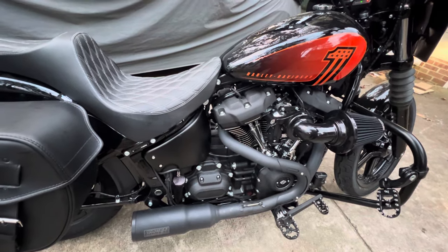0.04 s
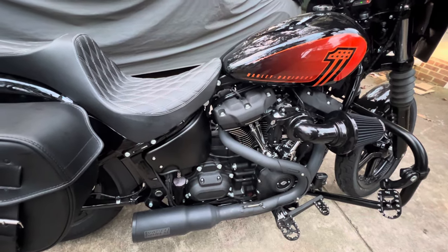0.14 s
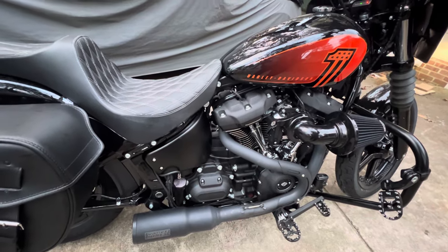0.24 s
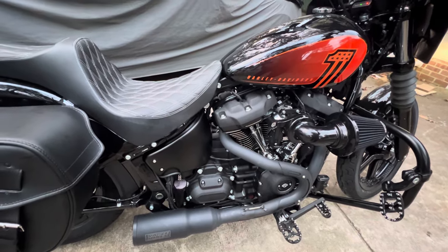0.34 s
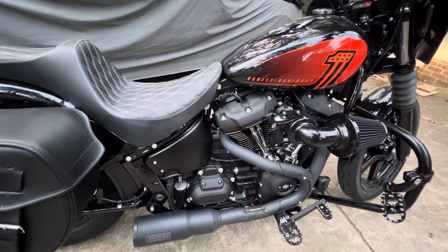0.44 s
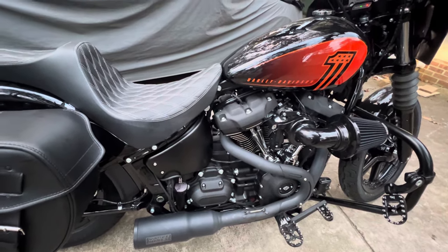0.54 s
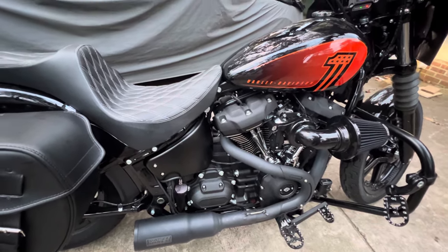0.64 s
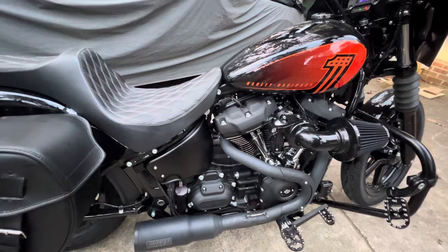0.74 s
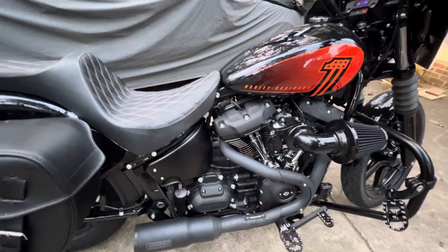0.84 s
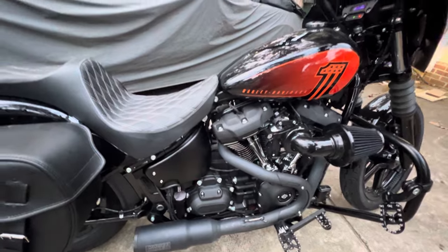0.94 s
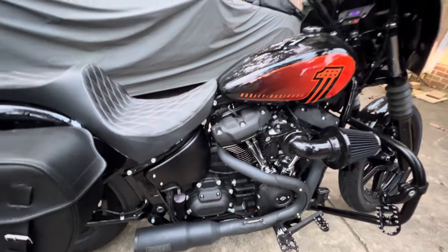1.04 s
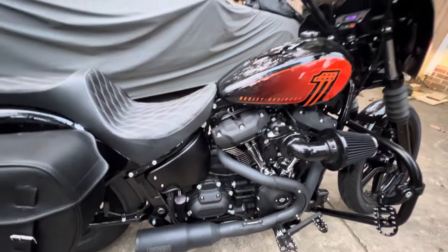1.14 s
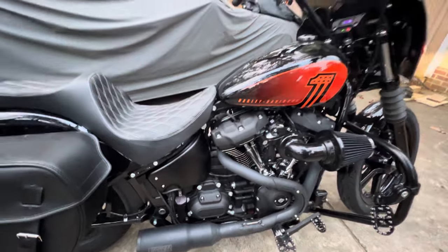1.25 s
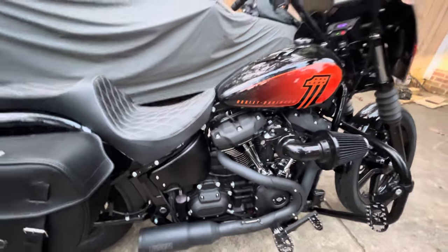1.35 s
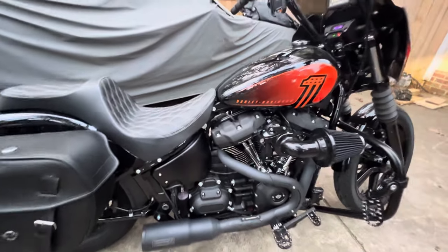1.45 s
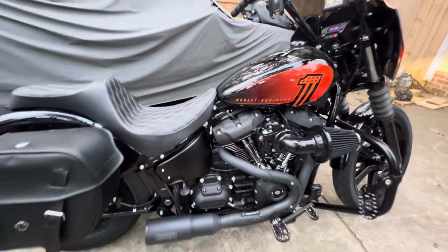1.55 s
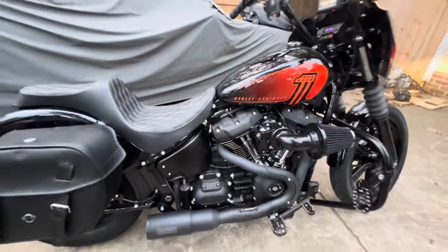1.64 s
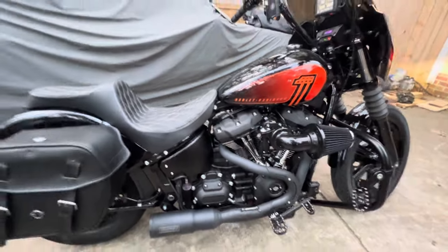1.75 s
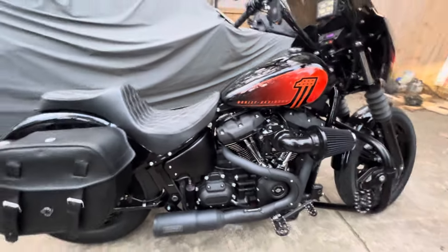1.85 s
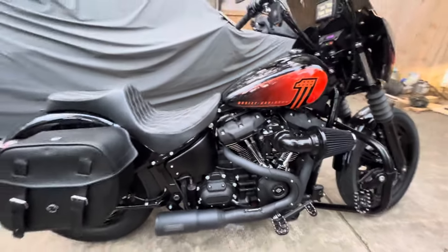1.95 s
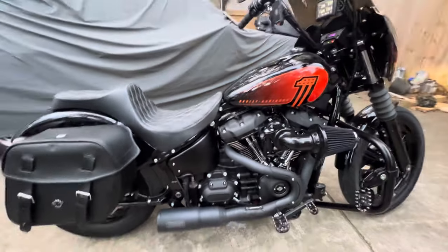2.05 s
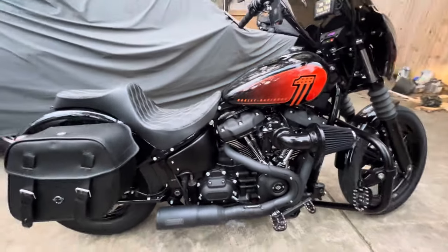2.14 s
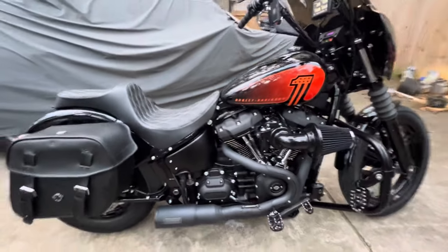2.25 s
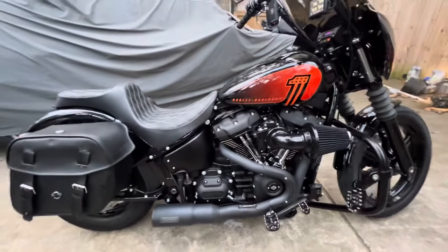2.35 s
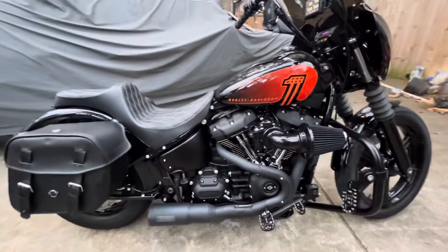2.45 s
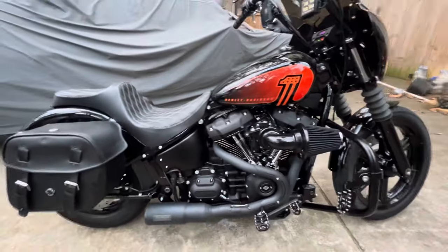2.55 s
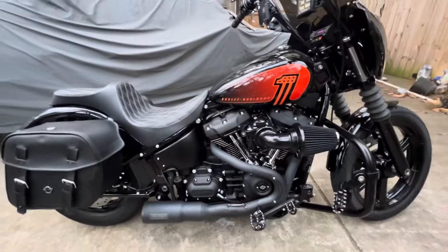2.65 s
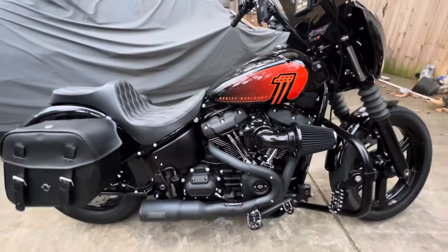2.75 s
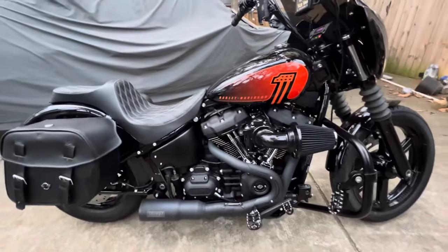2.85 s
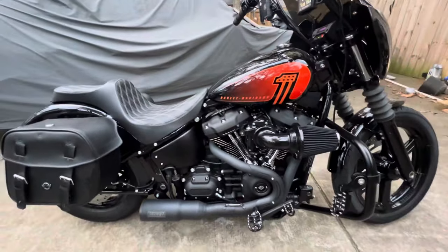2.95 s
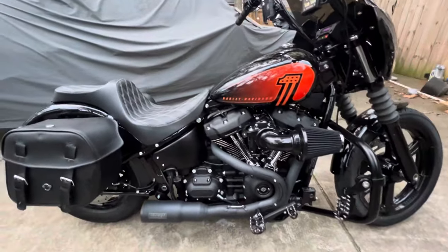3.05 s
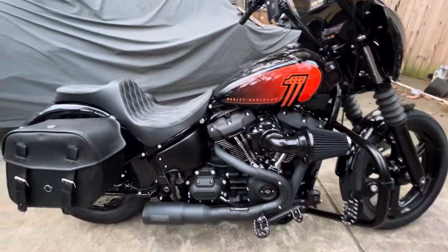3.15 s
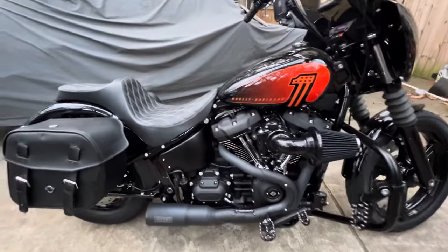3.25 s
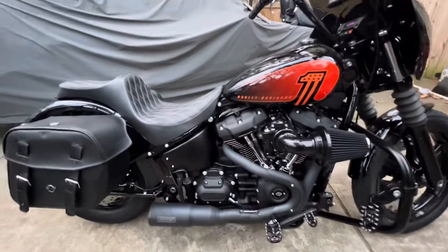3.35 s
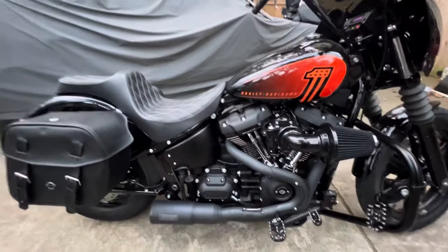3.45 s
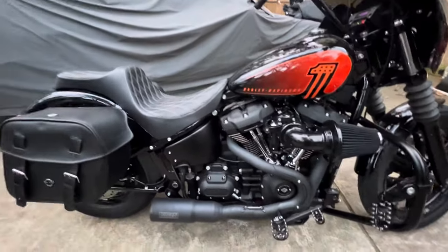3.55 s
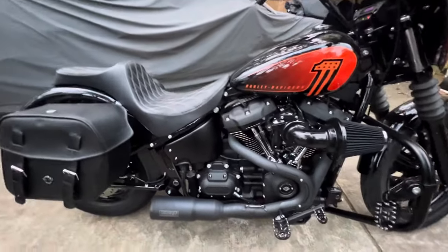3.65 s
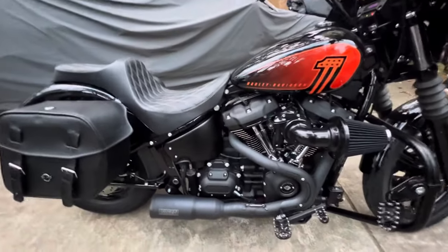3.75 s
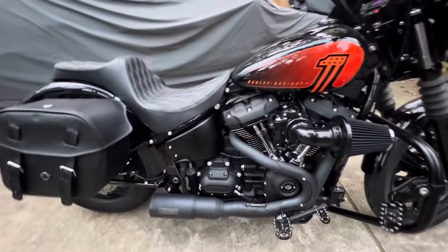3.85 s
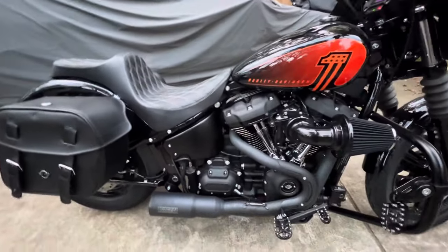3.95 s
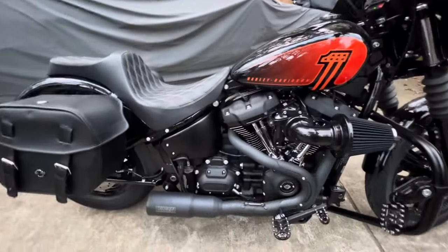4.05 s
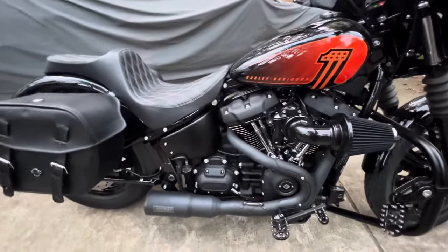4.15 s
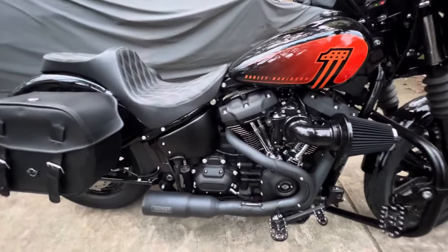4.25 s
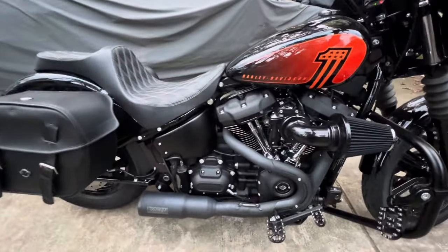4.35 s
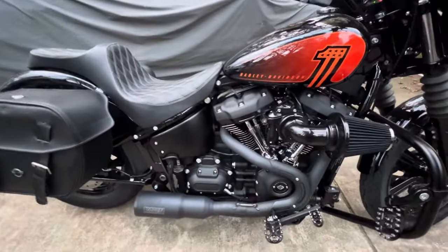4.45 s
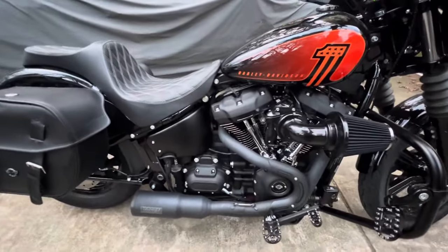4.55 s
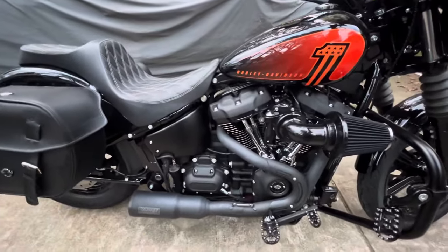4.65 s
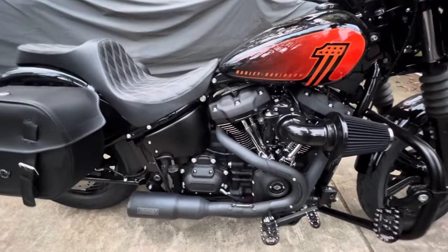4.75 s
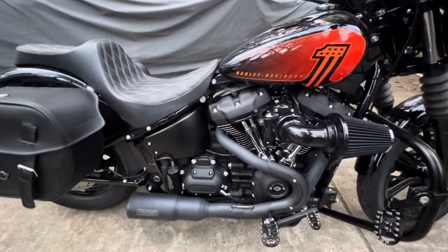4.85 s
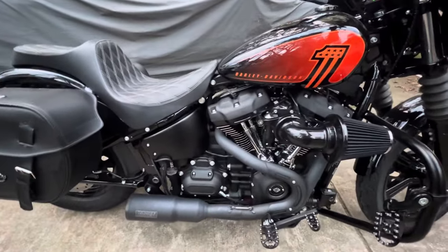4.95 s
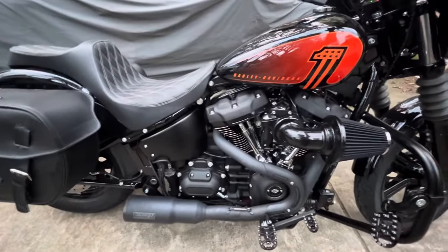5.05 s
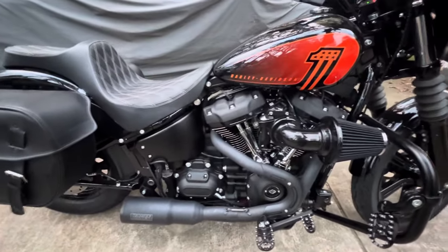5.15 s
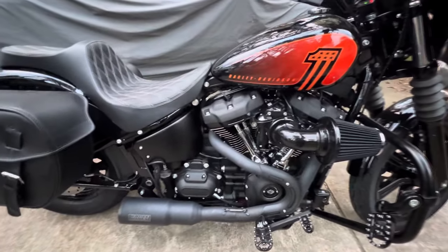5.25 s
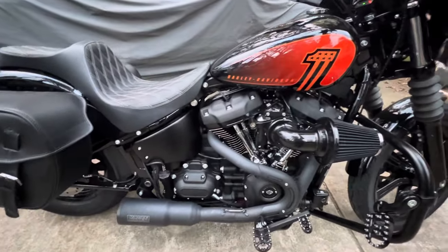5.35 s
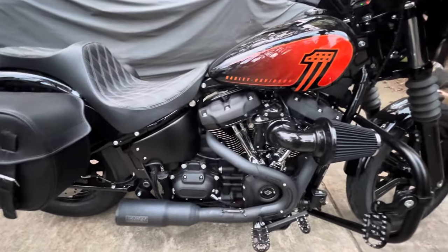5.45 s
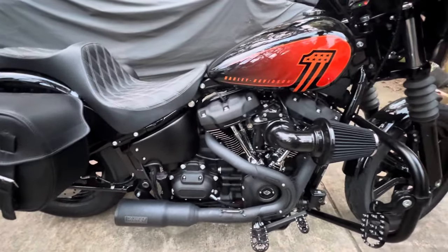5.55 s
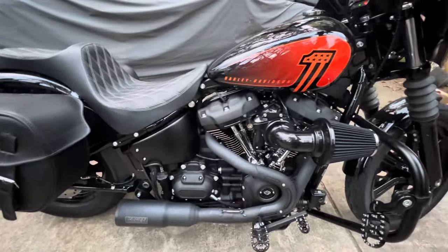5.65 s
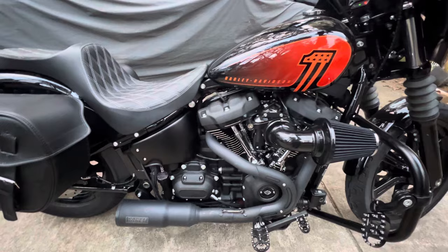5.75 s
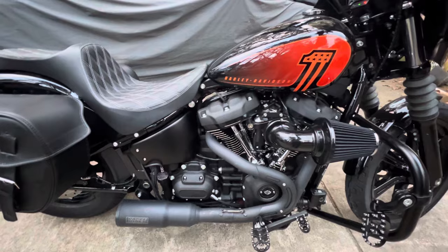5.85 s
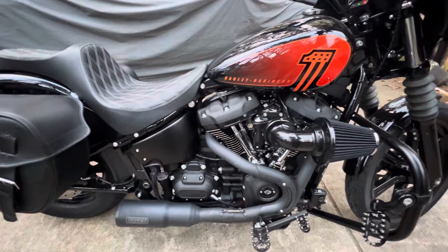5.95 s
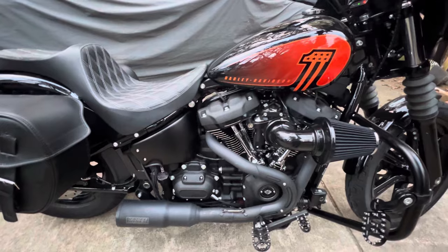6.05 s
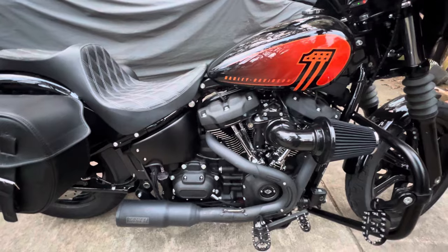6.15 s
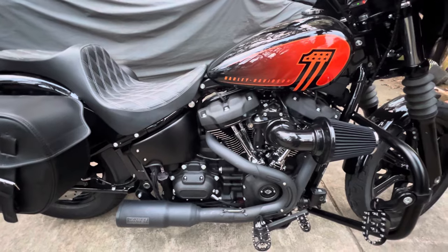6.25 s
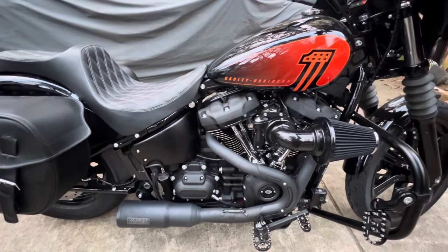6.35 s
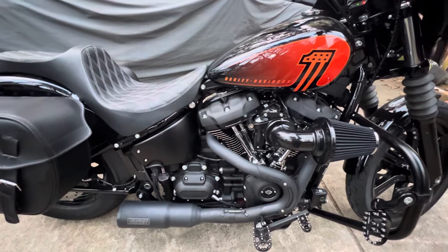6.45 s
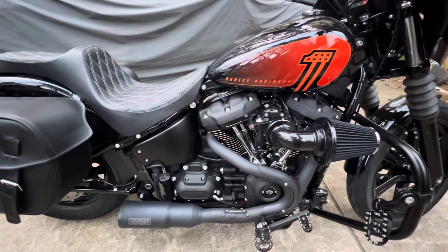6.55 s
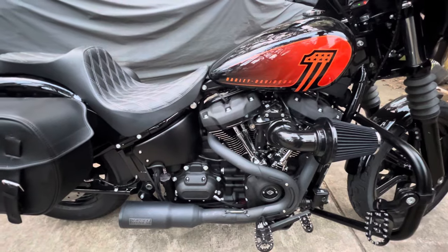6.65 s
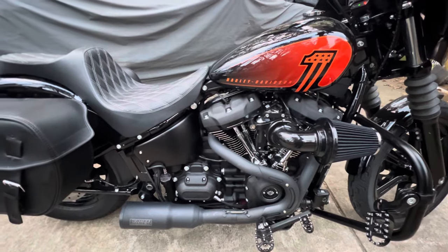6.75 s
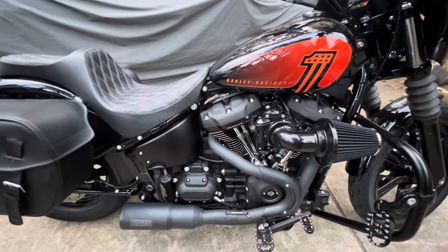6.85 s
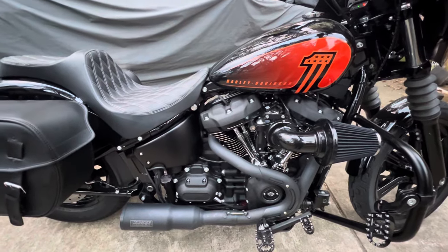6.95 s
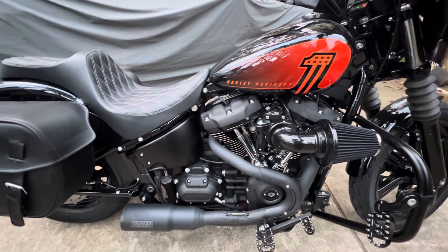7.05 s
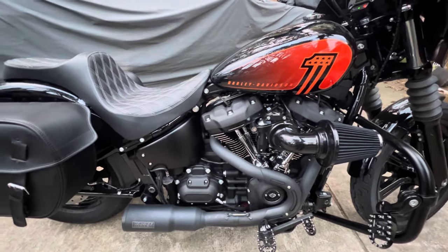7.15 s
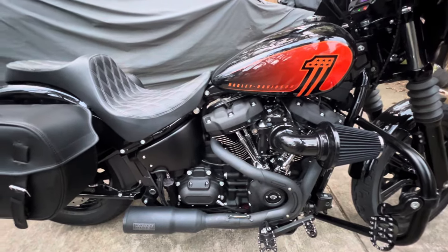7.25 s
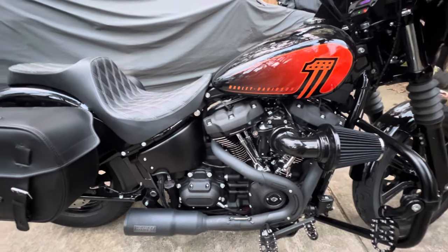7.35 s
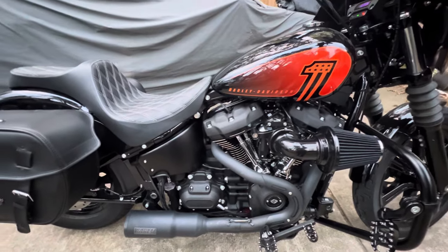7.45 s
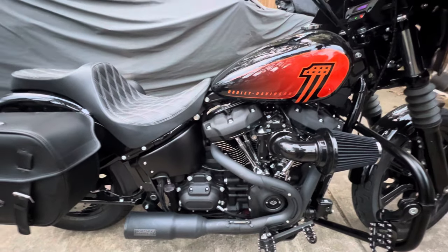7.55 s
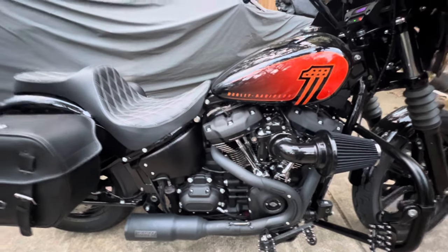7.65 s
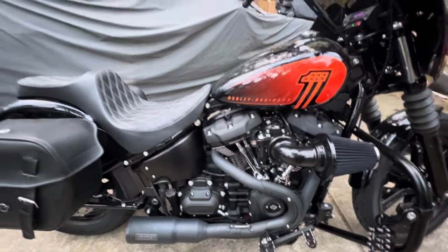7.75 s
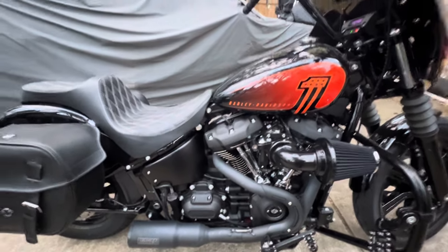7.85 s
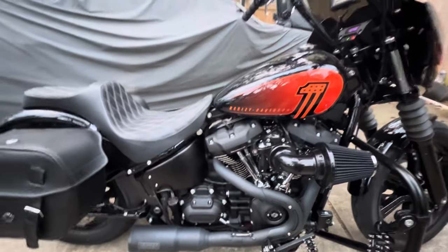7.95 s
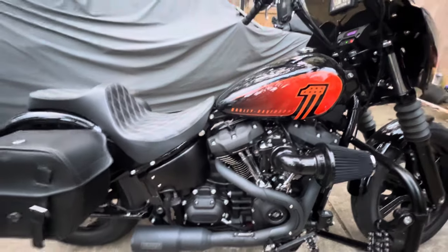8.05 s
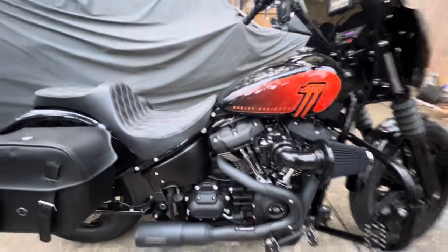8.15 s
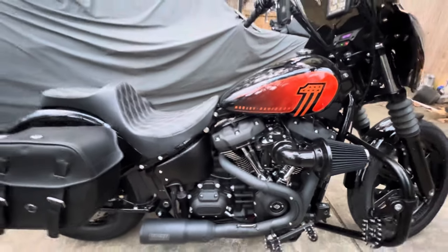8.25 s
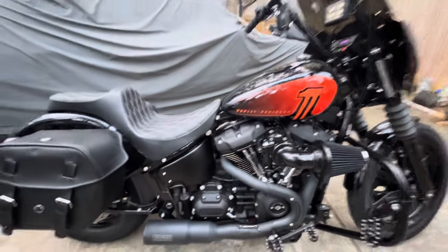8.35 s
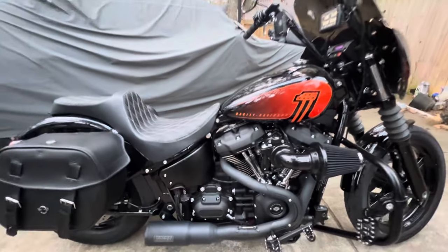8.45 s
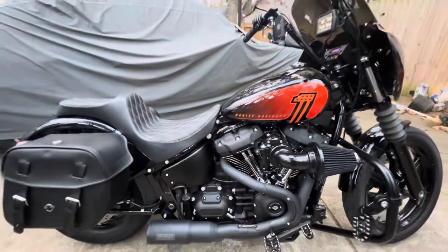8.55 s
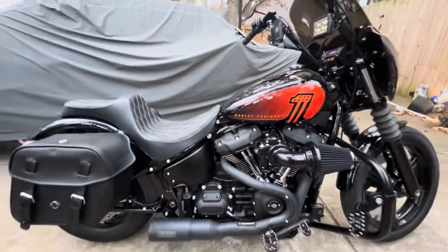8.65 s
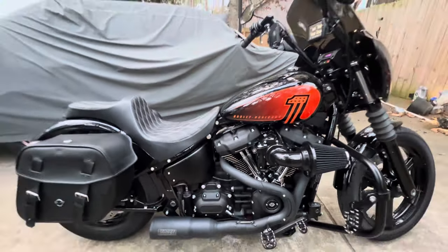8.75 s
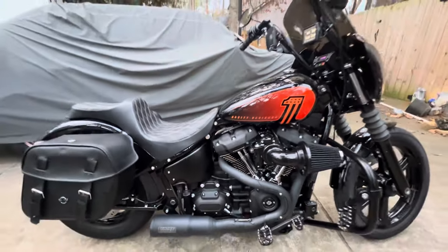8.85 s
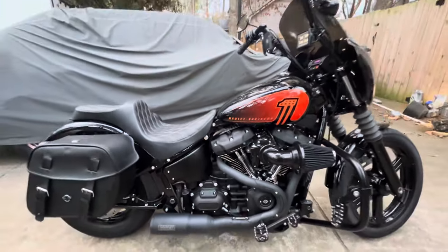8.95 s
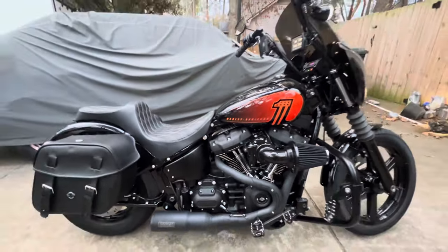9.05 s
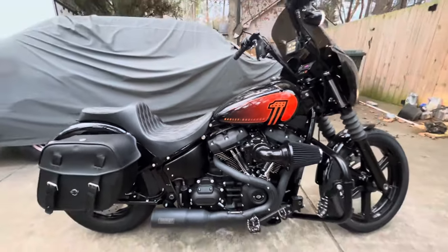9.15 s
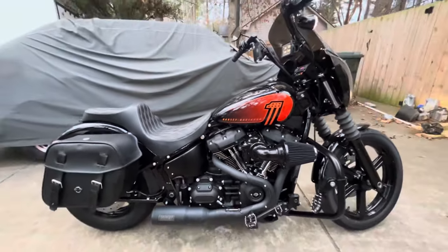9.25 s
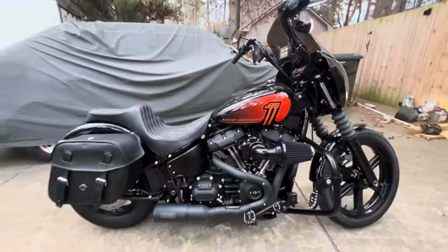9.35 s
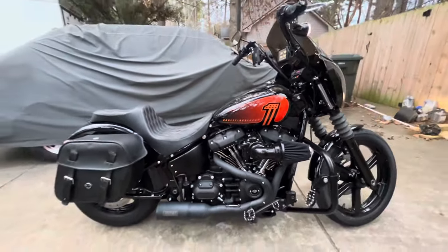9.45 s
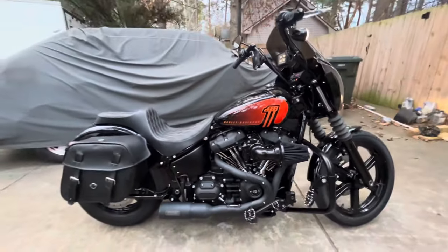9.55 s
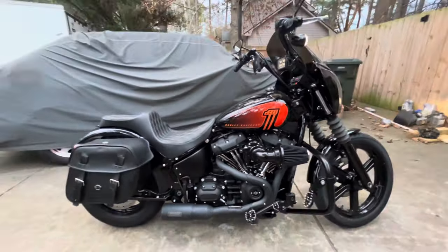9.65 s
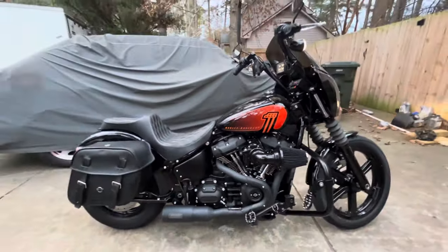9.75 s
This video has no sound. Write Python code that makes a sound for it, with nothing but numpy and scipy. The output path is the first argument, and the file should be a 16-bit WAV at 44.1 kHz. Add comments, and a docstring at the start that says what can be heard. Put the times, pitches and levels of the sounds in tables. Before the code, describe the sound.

Close handheld outdoor pickup of a heavy twin-cylinder motorcycle. Revs fall from a fast throb into lopsided, irregular thumps over mechanical rattle, soft air hiss and a faint fluttering gear whine. Midway the throttle is blipped four times, giving deep, hard barks and sharp crackles, each dropping back. The engine then winds down to lumpy idle, slightly quieter as the microphone moves away.

```python
"""A big 45-degree V-twin motorcycle, open exhaust, close by in a driveway: each exhaust stroke rings the pipe modes.
It starts fast, falls to a choppy idle as only some charges burn, and is blipped four times.
Strokes pop and crack as shaped noise and short swings; low orders of the cycle sum to a drone at speed.
Valve gear clatters and air hisses as beating noise; the cam drive whines at a multiple of the cycle.
A fence and a covered car answer with a decaying noise tail."""
import sys
import numpy as np
from scipy import signal
from scipy.fft import rfft, irfft, next_fast_len
from scipy.io import wavfile
from scipy.ndimage import uniform_filter1d, map_coordinates

SR = 44100
rng = np.random.default_rng(int(sys.argv[2]) if len(sys.argv) > 2 else 0)


def persist_wave(psi):
    """Save psi, clipped to +-1, as 16-bit WAV."""
    counts = np.round(np.clip(psi, -1, 1) * 32767).astype(np.int16)
    wavfile.write(sys.argv[1], SR, np.atleast_2d(counts).T)


N = 432180
SECONDS = np.arange(N) / SR


def amp(db):
    """dB to gain."""
    return 10 ** (np.asarray(db) / 20)


def unit(x):
    """Scaled to rms 1."""
    return x / np.sqrt(np.mean(x ** 2) + 1e-20)


def along(points, hz):
    """(f/Hz, value) points interpolated on a log frequency axis."""
    f, value = np.transpose(points)
    return np.interp(np.log(hz + 1), np.log(f + 1), value)


def curves(rows, x):
    """Each column after the first, interpolated at x."""
    knots, *columns = np.transpose(rows)
    return np.array([np.interp(x, knots, column) for column in columns])


def filtered(x, response):
    """x times a complex response of frequency."""
    size = next_fast_len(N + SR // 2)
    spectrum = rfft(x, size) * response(np.fft.rfftfreq(size, 1 / SR))
    return irfft(spectrum, size)[..., :N]


def noise(spectrum, channels=1):
    """Coloured noise of rms 1."""
    white = rng.standard_normal((channels, N))
    return unit(filtered(white, lambda hz: amp(along(spectrum, hz))))


def wobble(rate_hz):
    """Smooth random curve, rate_hz knots a second."""
    knots = rng.standard_normal(int(N * rate_hz / SR) + 4)
    return map_coordinates(knots, [SECONDS * rate_hz])


def lay(rows, start_s):
    """Sum of rows of samples, each from its own start time."""
    at = np.round(start_s * SR).astype(int)[:, None] + np.arange(rows.shape[1])
    inside = (at >= 0) & (at < N)
    return np.bincount(at[inside], rows[inside], N)


# pipe modes: f/Hz, relative level/dB, t60/s
THUMP_MODES = [(66.3, 2, 1), (101.7, 3.5, 0.18)]
BARK_MODES = [(139.1, -2, 0.75), (166.7, 2, 0.16), (220.6, 0.5, 0.37), (271, -8.5, 0.18)]
# gas jet spectra: f/Hz, relative level/dB
POP_SPECTRUM = [(200, -32), (330, -30), (400, -14), (520, 4.5), (800, 3.5), (1050, -4), (1300, -8.5),
                (1600, -19), (2200, -43.5)]
CRACK_SPECTRUM = [(820, -32), (1400, 2.5), (1730, 0), (2610, -4), (4040, -11.5), (4610, -11), (5380, -9),
                  (5950, -12.5), (7530, -23), (9230, -11.5), (11100, -19.5), (13200, -24.5), (14900, -27),
                  (16000, -42)]


def exhaust():
    """Pipe modes give thump and bark, the leaving gas pop and crack, the pumping a drone."""
    start_s, db, listed = strokes()
    thump_db, bark_db, pop_db, crack_db = db.T
    # at speed the drone carries most of the thump
    thump_cut_db = np.interp(np.gradient(start_s), [.03, .052], [-17, 0])
    # the lowest mode swings against the others
    thump = ring(THUMP_MODES, [1, -1], start_s, thump_db + thump_cut_db, listed, heat=0.42)
    bark = ring(BARK_MODES, [-1, -1, -1, -1], start_s, bark_db, listed, heat=0.81)
    pop_jet = burst(start_s, pop_db, peak_s=0.0029, t60_s=0.023)
    pop = amp(7.5) * pop_jet * noise(POP_SPECTRUM)[0] + knock(start_s, pop_db - 0.5)
    crack_jet = burst(start_s, crack_db, peak_s=0.0037, t60_s=0.04)
    crack = amp(5.5) * crack_jet * noise(CRACK_SPECTRUM)[0]
    return thump + bark + drone() + pop + crack


# exhaust strokes picked out one by one, strong and weak: t/s, relative thump, bark and crack level/dB
LISTED_STROKES = [(0.014, -21, -14.5, -40), (0.064, -21, -13.5, -42), (0.089, -24, -28.5, -28.5),
                  (0.114, -9, -19.5, -26), (0.162, -20, -21.5, -29), (0.189, -8, -22, -30.5),
                  (0.21, -0.5, -30, -29.5), (0.26, 1, -23, -32.5), (0.29, -19, -20, -32.5),
                  (0.367, -9, -24.5, -36.5), (0.396, -7, -21, -32), (0.451, 2.5, -22.5, -28.5),
                  (0.512, -18, -28, -38), (0.574, -28, -43, -41), (0.597, -8, -21, -39.5),
                  (0.633, -15, -20.5, -30), (0.699, -34, -32, -41), (0.837, -30, -25, -45.5),
                  (1.073, -18, -24.5, -63), (1.191, -23, -29, -51), (1.236, -16, -26, -52.5),
                  (1.447, -14, -30.5, -52), (1.499, -16.5, -21.5, -39.5), (1.738, -22, -28.5, -47.5),
                  (1.795, -22, -24.5, -40.5), (1.839, -19.5, -38, -60.5), (1.939, -24, -33, -59.5),
                  (2.045, -22.5, -35.5, -53), (2.148, -22.5, -34, -61), (2.262, -23.5, -34.5, -62),
                  (2.325, -22, -35, -62), (2.479, -24, -36.5, -63), (2.544, -20, -29.5, -47),
                  (2.823, -20.5, -31, -50.5), (2.887, -22.5, -41, -63), (3.126, -18.5, -23.5, -39),
                  (3.176, -18.5, -34.5, -47), (3.484, -16.5, -22.5, -39.5), (3.536, -17.5, -29, -43),
                  (3.778, -19, -27.5, -43), (3.846, -15, -22.5, -37), (3.898, -23, -44, -55),
                  (4.091, -16, -23, -43), (4.144, -16.5, -25, -41), (4.458, -14, -22.5, -39),
                  (4.51, -15.5, -23.5, -43), (4.692, -15.5, -15, -22), (4.733, -5.5, -22, -18.5),
                  (4.777, -6.5, -16.5, -25), (4.851, -2, -12, -30), (5.079, -4, -11.5, -22),
                  (5.112, 0.5, -17, -20), (5.149, -19, -12.5, -19), (5.175, 5.5, -16.5, -21.5),
                  (5.206, -18, -13.5, -28.5), (5.272, -21, -28, -38.5), (5.326, -25, -34, -45.5),
                  (5.353, -16, -22.5, -40), (5.386, -16, -33, -36.5), (5.413, -10, -21, -35.5),
                  (5.473, -10, -20, -47), (5.533, -11, -21.5, -41.5), (5.594, -20, -15, -45),
                  (5.63, -25, -19.6, -49),  (5.772, -10, -22.5, -52.5), (5.925, -27, -23.5, -60),
                  (6.223, -8, -17, -32.5), (6.269, -7.5, -15, -25), (6.302, 0.5, -15.5, -33),
                  (6.338, -11, -12.5, -23), (6.367, 4, -13, -25.5), (6.401, -19, -10.5, -27.5),
                  (6.425, -4.5, -13.5, -29), (6.453, -5.5, -16, -35.5), (6.483, -11, -13.5, -37.5),
                  (6.519, 1.5, -29, -28.5), (6.542, -9, -18, -29.5), (6.6, -20, -17.5, -32),
                  (6.69, -14, -12.5, -25.5), (6.904, -20, -12, -26.5), (6.937, -25, -16, -21),
                  (6.959, 1.5, -12, -19), (6.99, -14, -17, -21), (7.011, -3.5, -14, -24),
                  (7.073, -16, -21, -35.5), (7.101, -24, -16.5, -33.5), (7.147, -28, -18, -31.5),
                  (7.17, -12, -18.5, -34), (7.197, -21, -36, -37), (7.22, -22, -21.5, -35.5),
                  (7.302, -21, -23, -32.5), (7.416, -2, -24.5, -35), (7.439, -16, -19.5, -38),
                  (7.475, -15, -18, -33.5), (7.537, -15, -21, -45), (7.6, -19, -24.5, -38.5),
                  (7.697, -6.5, -25.5, -45), (7.96, -12, -22.5, -45.5), (8.127, -12.5, -24.5, -71),
                  (8.213, -14, -22.5, -47.5), (8.246, -18, -29, -47.5), (8.421, -12, -27, -43),
                  (8.473, -15, -20.5, -42.5), (8.721, -19, -28, -48), (8.776, -20, -27, -44.5),
                  (9.037, -21, -26.5, -45), (9.095, -22, -32.5, -52), (9.315, -22.5, -27, -45.5),
                  (9.362, -21, -29.5, -50.5), (9.658, -18, -24, -42), (9.709, -21.5, -31, -49)]
# all other strokes, burnt or not, by speed: speed/(cycles/s), relative thump, bark and crack level/dB
RULED_LEVELS = [(8.3, -25.5, -39.5, -75), (10, -21, -36, -76), (13, -12.5, -31.5, -51.5),
                (16, -7.5, -26, -46), (20, -22.5, -22.5, -43)]
# scatter of those other strokes: thump, bark, crack [dB, standard deviation]
RULED_SCATTER_DB = [3.5, 2.5, 4]
# microphone carried nearer to the engine and away: t/s, relative level/dB
NEARNESS = [(0, 3.5), (.7, -1.5), (2, -2), (3, -1), (4, 1), (5.3, 4), (6.2, 4.5), (7.6, 2), (8.6, -1),
            (9.8, -3.5)]
POP_OVER_CRACK_DB, POP_SCATTER_DB = 9, 1.5


def strokes():
    """Time, four levels and listed-or-not of every exhaust stroke; the crank angle times the unlisted."""
    angle, speed = crank()
    whole = np.arange(np.floor(angle[0]), np.ceil(angle[-1]))
    cycles = np.ravel([whole, whole + SECOND_CYLINDER], order="F")
    cycles = cycles[(cycles > angle[0]) & (cycles < angle[-1])]
    t = np.interp(cycles, angle, SECONDS)
    chance = rng.standard_normal((len(t), 4))
    ruled_db = curves(RULED_LEVELS, np.interp(t, SECONDS, speed)).T
    db = ruled_db + curves(NEARNESS, t).T + chance[:, :3] * RULED_SCATTER_DB
    # a listed stroke replaces the time and levels of the nearest one
    rows = np.array(LISTED_STROKES)
    nearest = np.abs(t - rows[:, :1]).argmin(axis=1)
    listed = np.isin(np.arange(len(t)), nearest)
    t[nearest], db[nearest] = rows[:, 0], rows[:, 1:]
    pop_db = db[:, 2] + POP_OVER_CRACK_DB + POP_SCATTER_DB * chance[:, 3]
    return t, np.column_stack([db[:, 0], db[:, 1], pop_db, db[:, 2]]), listed


def ring(modes, signs, start_s, db, listed, heat):
    """Pipe modes struck by each stroke and stopped by the next opening valve."""
    gap_s = np.diff(start_s, append=start_s[-1] + 0.096)[:, None]
    cycle_s = gap_s + np.roll(gap_s, 1)
    listed = listed[:, None]
    lead_s = .01
    t = np.arange(SR // 10) / SR - lead_s
    # the pressure trough follows the valve by a crank angle; unlisted slow strokes: sooner, less evenly
    slow = np.clip(cycle_s - .06, 0, 1)
    lag_s = np.clip(0.0861 * cycle_s - .002 - np.where(listed, 0, 0.067 * slow), 0, 1)
    uneven_s = np.where(listed, .0003, 0.00089 + 0.0098 * slow)
    # more strokes a second heat the gas and raise the modes
    warm = 1 + heat * np.clip(.11 - cycle_s, 0, 1)
    opening = np.clip((t - lag_s + .005) / .005, 0, 1)
    closing = np.clip((gap_s + lag_s - t) / 0.0093, 0, 1)
    gate = np.sin(np.pi / 2 * opening) ** 2 * np.sin(np.pi / 2 * closing) ** 2
    chance = rng.standard_normal((len(start_s), 3, len(modes)))
    rows = 0
    for k, (hz, level_db, t60_s) in enumerate(modes):
        pitch_hz = hz * warm * (1 + .018 * chance[:, 0, k:k + 1])
        phase = 2 * np.pi * pitch_hz * (t - lag_s + uneven_s * chance[:, 1, k:k + 1])
        decay_db = level_db + 2.3 * chance[:, 2, k:k + 1] - 60 * t / t60_s
        rows = rows + signs[k] * amp(decay_db) * np.cos(phase)
    rows = rows * gate
    # db sets each stroke's rms over the gap to the next
    rms = np.sqrt(np.sum(rows ** 2, axis=1, keepdims=True) / (gap_s * SR))
    return lay(rows / rms * amp(db)[:, None], start_s - lead_s)


def burst(start_s, db, peak_s, t60_s):
    """Envelope of a gas jet: quick rise to its peak, then a fall."""
    t = np.arange(SR // 12) / SR
    shape = np.clip(t / peak_s, 0, 1) ** 2 * amp(-60 * np.maximum(t - peak_s, 0) / t60_s)
    return lay(amp(db)[:, None] * shape, start_s - .001)


def knock(start_s, db):
    """The jet's front rings the muffler end for a few swings, at a new pitch each time."""
    t = np.arange(SR // 40) / SR
    peak_s = .002
    hz = 720 * np.exp(0.2 * rng.standard_normal((len(start_s), 1)))
    envelope = (t / peak_s) ** 2 * np.exp(2 - 2 * t / peak_s)
    swings = np.sin(2 * np.pi * hz * t) * envelope
    return lay(amp(db)[:, None] * swings, start_s + 0.00095)


# drone from piston pumping: speed/(cycles/s), relative level/dB
DRONE_LEVEL = [(8, -36), (11, -25.5), (14, -22.5), (17, -14.5), (21, -11)]
# pipe gain on the drone: f/Hz, relative level/dB
PIPE_GAIN = [(25, -45), (42, -17), (58, 8), (85, 4.5), (115, -3.5), (150, -25.5), (200, -10), (245, -16.5),
             (310, -25)]


def drone():
    """Low orders of the cycle: both cylinders push, and the pipe favours its own range."""
    angle, speed = crank()
    order = np.arange(2, 18)[:, None]
    phase = 2 * np.pi * order * (angle - .06)
    pushes = np.cos(phase) + 0.72 * np.cos(phase - 2 * np.pi * order * SECOND_CYLINDER)
    gain = amp(along(PIPE_GAIN, order * speed))
    orders = np.sum(gain * pushes, axis=0) / np.linalg.norm(gain, axis=0)
    unsteady_db = .8 * wobble(9)
    return -amp(along(DRONE_LEVEL, speed) + unsteady_db) * orders


# engine speed, falling after each blip: t/s, speed/(four-stroke cycles/s)
ENGINE_SPEED = [(0, 20.94), (.3, 19.17), (.9, 13.1), (1.5, 10.67), (2.2, 9.12), (3.4, 8.19), (4.66, 8.41),
                (4.84, 14.6), (5.06, 12.4), (5.22, 17.39), (5.62, 15.72), (5.76, 13.5), (6.2, 10.81),
                (6.43, 17.78), (6.88, 15.84), (7.03, 20.31), (7.5, 16.39), (7.95, 12.56), (8.7, 9.77),
                (9.8, 8.37)]
FIRST_CYCLE = -.85  # crank position at the start, cycles
SECOND_CYLINDER = 315 / 720  # second cylinder's stroke after the first, cycles


def crank():
    """Cycles run (integral of speed) and cycles a second, at every sample."""
    speed = curves(ENGINE_SPEED, SECONDS)[0]
    return FIRST_CYCLE + np.cumsum(speed) / SR, speed


# valve gear and air intake: speed/(cycles/s), relative rattle and hiss level/dB
GEAR_LEVELS = [(8.3, -44.5, -50), (10, -43, -50.5), (13, -39, -47), (16, -37, -43.5), (20, -27.5, -42)]
# noise spectra: f/Hz, relative level/dB
RATTLE_SPECTRUM = [(150, -23), (250, -1.5), (313, -9.5), (426, -12.5), (566, -8), (1000, -22), (1500, -35),
                   (1950, -52.5), (3300, -120)]
HISS_SPECTRUM = [(710, -48.5), (1200, -9.5), (2040, -3), (4000, -11), (4550, -7), (5300, -16.5), (6230, -8),
                 (7410, -17), (8720, -7.5), (9820, -16.5), (10400, -39), (11200, -41), (12600, -19.5),
                 (14200, -31), (16000, -58.5)]


def gear():
    """Valve clatter and intake hiss as noise beating with the cycle, plus the cam whine."""
    angle, speed = crank()
    near_db = curves(NEARNESS, SECONDS)
    rattle_db, hiss_db = curves(GEAR_LEVELS, speed) + near_db
    beat = np.cos(4 * np.pi * angle) + 0.63 * np.cos(8 * np.pi * angle + 1.5)
    pulse_db = 3 * np.cos(4 * np.pi * (angle - .05))  # low clatter swells twice a cycle
    rattle_gain = amp(rattle_db - 1.5 + 2.8 * wobble(40) + pulse_db)
    rattle = rattle_gain * noise(RATTLE_SPECTRUM, channels=2)
    rattle = rattle + 0.21 * rattle[::-1]  # partly shared by both ports
    hiss_gain = amp(hiss_db + 1.44 * wobble(60) + 0.16 * beat)
    hiss = hiss_gain * noise(HISS_SPECTRUM, channels=2)
    left_right = np.array([[1.3], [.6]])
    return rattle + hiss + whine() * amp(0.83 * near_db) * left_right


# whine, loudest where the case resonates: f/Hz, relative level/dB
WHINE_LEVEL = [(1350, -68.5), (1500, -69), (1650, -59), (1800, -66), (2050, -56.5), (2200, -54),
               (2330, -72), (2600, -80)]
# thin steady tone woken by the whine's overtone: overtone f/Hz, relative level/dB
OVERTONE_RING = [(2950, -83), (3080, -63), (3250, -57), (3400, -58), (3500, -93)]
TEETH = 167  # whine cycles per engine cycle
WANDER_HZ = 60.33  # slow random pitch wander of the whine, at idle only
RING_HZ, RING_WIDTH_HZ = 3200, 70


def whine():
    """Breathy gear-mesh tone, fluttering in pitch and strength, and the tone its overtone wakes."""
    mesh_hz = TEETH * crank()[1]
    idle = np.clip((1800 - mesh_hz) / 400, 0, 1)
    heard_hz = mesh_hz + WANDER_HZ * idle * wobble(6)
    rising_hz_per_s = uniform_filter1d(np.gradient(mesh_hz) * SR, size=SR // 30)
    loaded_db = np.clip(rising_hz_per_s / 100, 0, 30)  # it drops away while the engine gathers speed
    phase = 2 * np.pi * np.cumsum(heard_hz + 60 * wobble(200)) / SR
    tone_db = along(WHINE_LEVEL, heard_hz) + 8.5 + 2.1 * wobble(14) - loaded_db
    tone = amp(tone_db) * (1 + .5 * wobble(110)) * np.sin(phase)
    ring_db = along(OVERTONE_RING, 2 * mesh_hz) + 4.1 * wobble(14) - loaded_db
    skirt_hz = 3 * RING_WIDTH_HZ
    band = [(RING_HZ - skirt_hz, -60), (RING_HZ, 0), (RING_HZ + skirt_hz, -60)]
    return tone + amp(ring_db) * noise(band)[0]


# yard decay: f/Hz, t60/s
YARD_DECAY = [(100, 0.3), (500, 0.12), (2000, 0.36), (10000, 0.052)]


def yard(x):
    """Fence and car answer: a noise tail in which each frequency dies at its own rate."""
    hz, t, bins = signal.stft(rng.standard_normal((2, SR // 3)), SR, nperseg=256)
    decay = amp(-60 * t / along(YARD_DECAY, hz)[:, None])
    tail = signal.istft(bins * decay, SR, nperseg=256)[1]
    tail = signal.lfilter(*signal.butter(2, 250, "high", fs=SR), tail)
    delayed = np.pad(x, (200, 0))[None]  # 200 samples
    return signal.fftconvolve(delayed, tail / np.linalg.norm(tail[0]), axes=1)[:, :N]


# phase between the ports: f/Hz, left lead/rad
PORT_PHASE = [(0, 0), (340, 0.1), (1210, 3.3), (1810, 2.5), (4570, 6.7), (6460, -0.3), (6800, -0.1),
              (9470, 6.4), (9990, 3.1), (11500, 3.2), (12200, 0.1), (14600, -0.1), (15300, -2.6),
              (15800, -3.1)]
# level between the ports: f/Hz, left minus right level/dB
PORT_LEVEL = [(60, -1.5), (110, -1), (200, -3.5), (380, -6.5), (700, 1), (1290, 9.5), (2380, 4),
              (4400, 5.5), (8120, 13.5), (15000, -10)]


def scene():
    """The exhaust reaches two microphone ports with its own phase and level at each; yard and gear add."""
    pipe = exhaust()
    side = np.array([[.5], [-.5]])

    def ports(hz):
        """Half the level and phase difference to each port, with opposite signs."""
        return amp(side * along(PORT_LEVEL, hz)) * np.exp(1j * side * along(PORT_PHASE, hz))

    near = filtered(pipe, ports)
    answer = amp(-14) * yard(pipe)
    return near + answer + gear()


TOP_HZ = 16100


def record(dry):
    """The microphone drops the deepest bass, rounds the highest peaks and keeps nothing above TOP_HZ."""
    x = signal.lfilter(*signal.butter(3, 42, "high", fs=SR), dry)
    x = x / (1 + np.abs(x / .97) ** 4) ** (1 / 4)
    return filtered(x, lambda hz: hz < TOP_HZ)


dry = scene()
out = record(dry)
persist_wave(out)
```